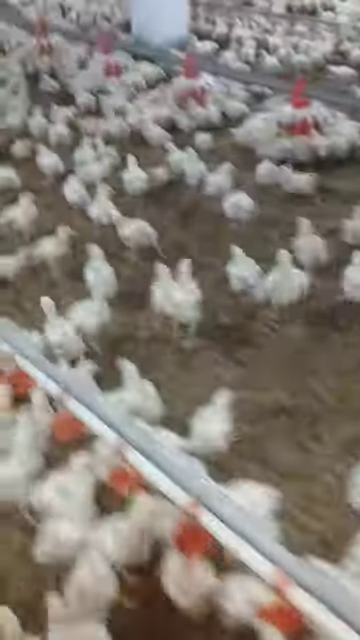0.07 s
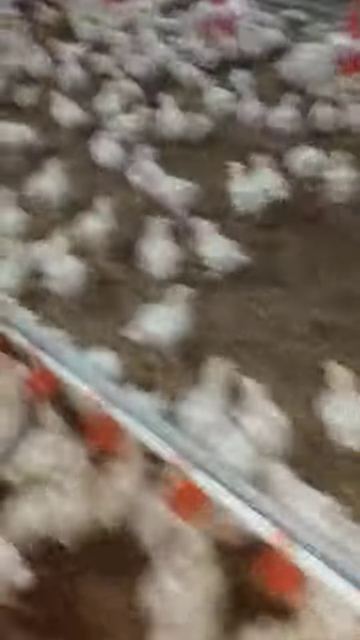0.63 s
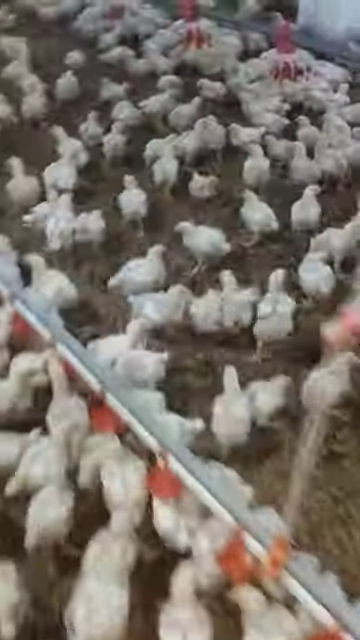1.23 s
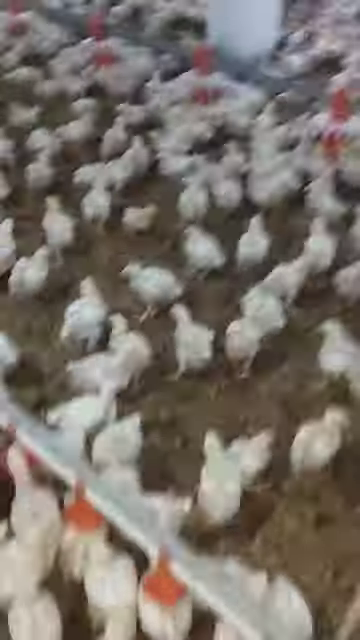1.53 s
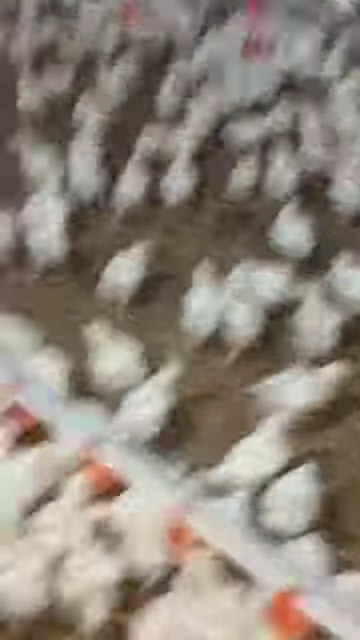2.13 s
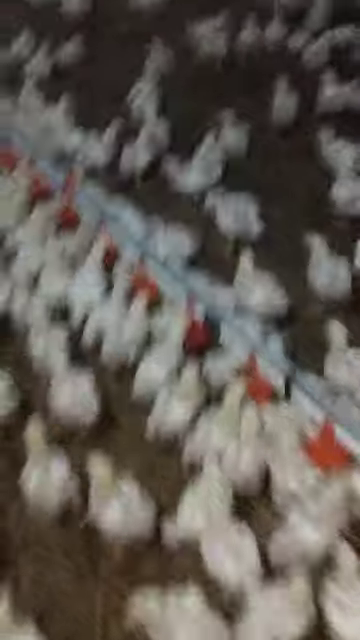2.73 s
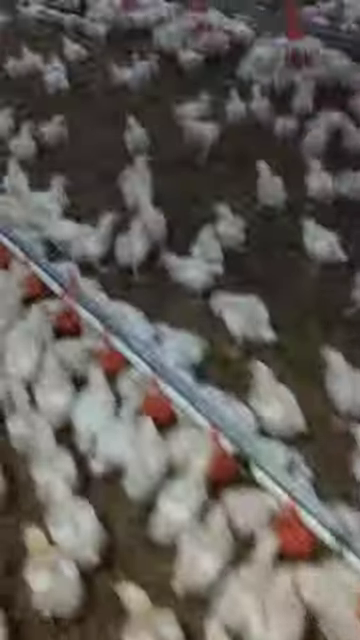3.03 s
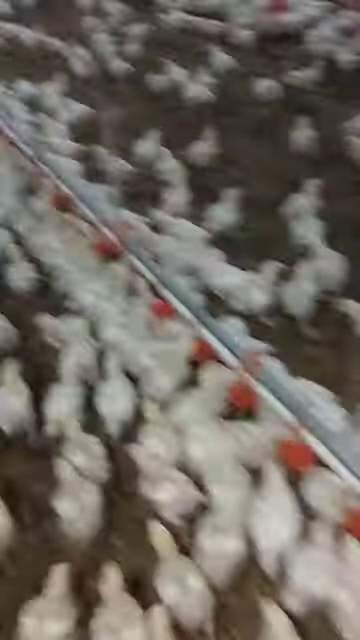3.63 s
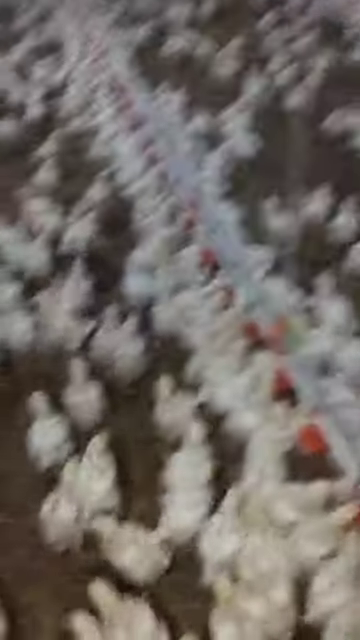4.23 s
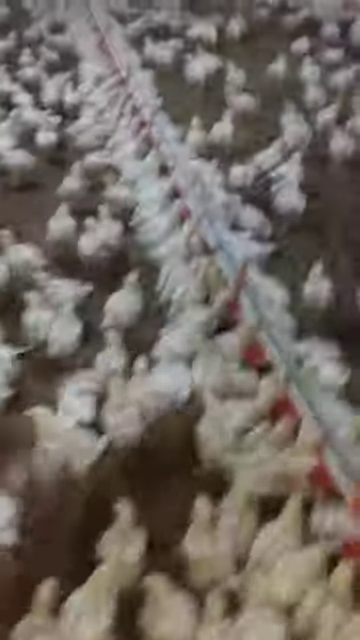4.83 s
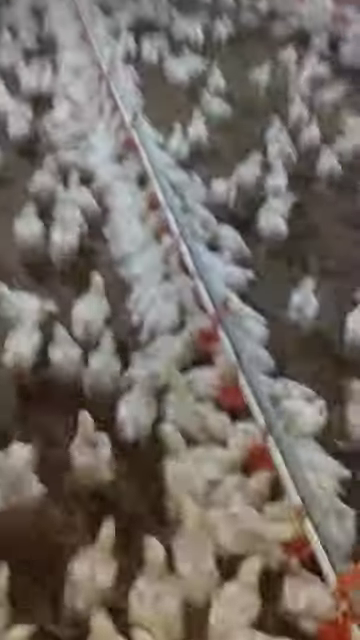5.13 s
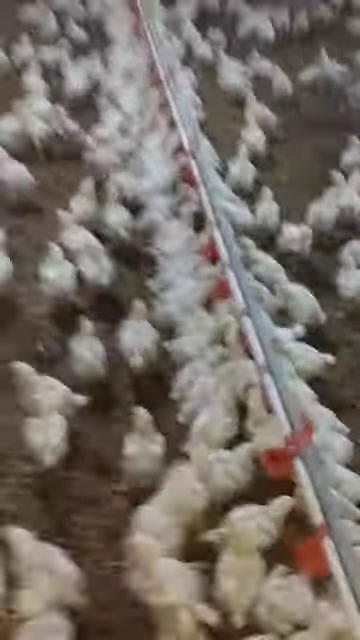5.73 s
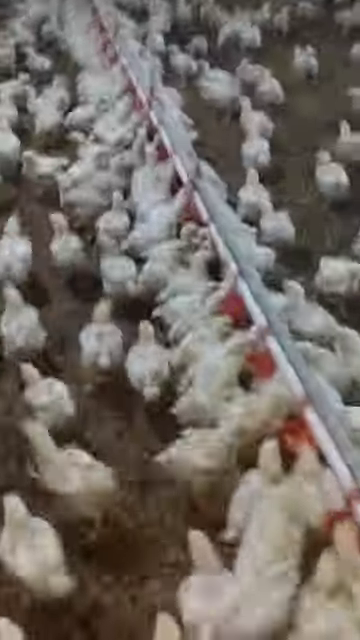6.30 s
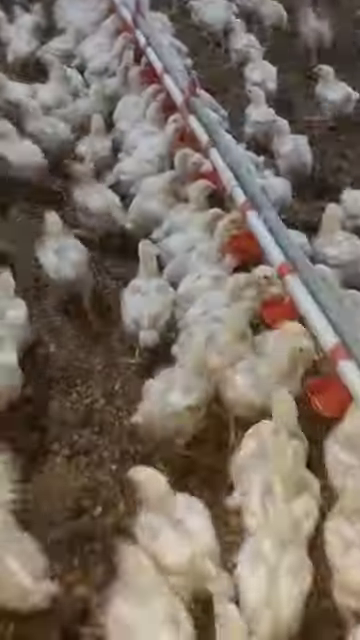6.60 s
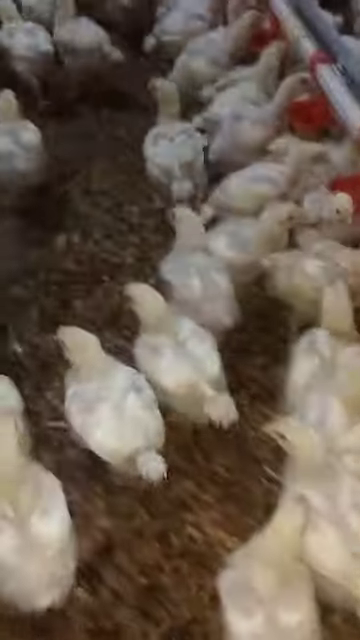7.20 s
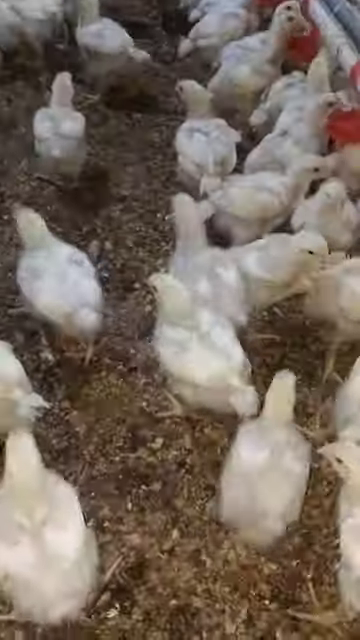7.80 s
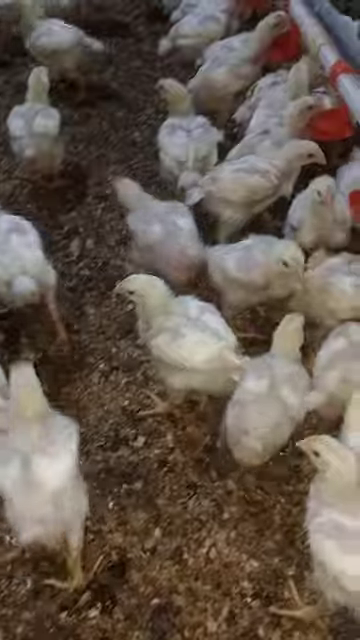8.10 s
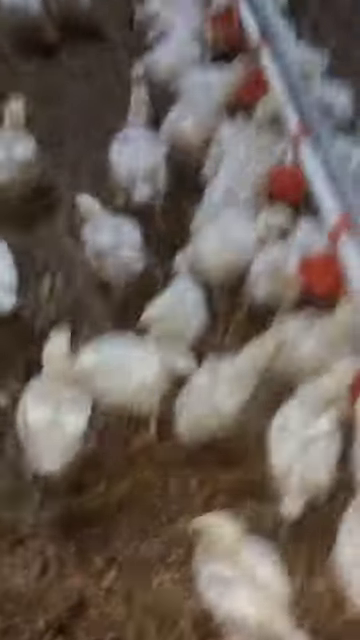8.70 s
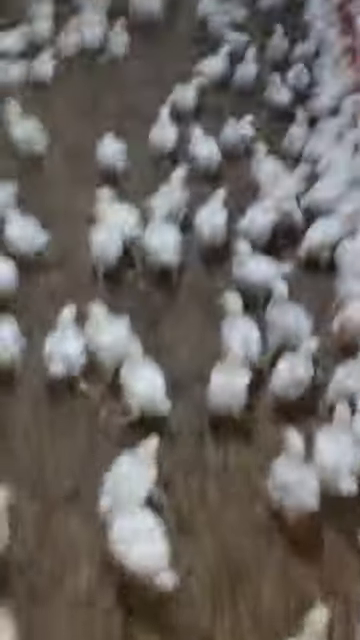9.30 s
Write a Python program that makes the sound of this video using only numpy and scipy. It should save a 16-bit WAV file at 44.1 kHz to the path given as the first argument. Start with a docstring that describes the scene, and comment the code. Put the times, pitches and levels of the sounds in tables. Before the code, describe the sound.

Inside a poultry shed, a dense, slightly echoing chorus of young chickens chirps over the pulsing hum and airy rumble of fans. The hand-held microphone is partly covered at first and opens up with a short bump. Close high trills and squeaks stand out around the middle, then separate falling peeps as the flock eases a little. Light pecks and litter rustle are scattered through, and the chorus swells again near the end.

```python
"""Hundreds of young chickens peep down a long poultry shed, their far voices merged into a band of chatter.
Under them two ventilation fans beat against each other, with a rumble and a rush of air.
Close to the hand-held microphone, birds whistle, trill and squeak, scratch and peck in the litter.
The hand half covers the microphone port at first; the treble opens as it comes free with a bump."""
import sys
import numpy as np
from scipy import signal
from scipy.fft import rfft, irfft, next_fast_len
from scipy.io import wavfile

SR = 44100
rng = np.random.default_rng(int(sys.argv[2]) if len(sys.argv) > 2 else 0)


def waveform_to_disk(signal):
    """Save audio, clipped to [-1, 1], as 16-bit WAV at the path in sys.argv[1]."""
    frames = np.transpose(np.atleast_2d(signal))
    scaled = np.clip(frames, -1, 1) * 32767
    samples = np.round(scaled).astype(np.int16)
    wavfile.write(sys.argv[1], SR, samples)


N = 421155
TIME = np.arange(N) / SR


def from_db(db):
    """Decibels to gain."""
    return 10 ** (np.asarray(db) / 20)


def unit_rms(x):
    """Scale to rms 1."""
    return x / np.sqrt(np.mean(x ** 2) + 1e-20)


def gains_in_time(rows):
    """One gain curve for each dB column that follows the time column."""
    seconds, *columns = np.transpose(rows)
    return [from_db(np.interp(TIME, seconds, db)) for db in columns]


def gain_at(spectrum, hz):
    """Read a spectrum's gain on a log-frequency axis."""
    points, db = np.transpose(spectrum)
    return from_db(np.interp(np.log(hz + 1e-9), np.log(points), db))


def noise(spectrum):
    """Coloured noise, rms 1."""
    size = next_fast_len(N)
    colour = gain_at(spectrum, np.fft.rfftfreq(size, 1 / SR))
    return unit_rms(irfft(rfft(rng.standard_normal(size)) * colour, size)[:N])


def drift(rate_hz, size=N):
    """A random wander, spread about 1."""
    steps = TIME[:size] * rate_hz + rng.random()
    knots = rng.standard_normal(int(steps[-1]) + 2)
    return np.sqrt(3 / 2) * np.interp(steps, np.arange(len(knots)), knots)


def split(x, hz, order=4):
    """The parts below and above a frequency."""
    low = signal.sosfiltfilt(signal.butter(order, hz, fs=SR, output="sos"), x)
    return low, x - low


def add(out, start_s, sound):
    """Mix a sound in at a time, trimmed to the scene."""
    i = int(start_s * SR)
    first, last = max(i, 0), min(i + len(sound), N)
    if last > first:
        out[first:last] += sound[first - i:last - i]


def shed(x, wet_db, t60_s=1):
    """The direct sound reaches the microphone, then the shed's tail, dulled by litter and feathers."""
    t = TIME[:SR]
    dull, _ = split(rng.standard_normal(SR), 7600, order=1)
    tail = dull * from_db(-60 * t / t60_s) * (t > .006)
    return x + from_db(wet_db) * signal.fftconvolve(x, tail / np.linalg.norm(tail))[:N]


TRILL_RATE_HZ = 40.96


def syrinx(length_s, start_hz, middle_hz, end_hz, depth_hz, rate_hz):
    """Pitch and loudness of one peep: an arc through three pitches, with a quick start."""
    t = TIME[:max(int(length_s * SR), 64)]
    u = t / t[-1]
    pitch = start_hz + (end_hz - start_hz) * u + (2 * middle_hz - start_hz - end_hz) * 2 * u * (1 - u)
    if depth_hz:
        # a trill is a chain of uneven arches with sharp dips between them
        arches = np.abs(np.cos(np.pi * rate_hz * t + 0.305 * drift(44.96, len(t))))
        pitch = pitch + 2 * depth_hz * (arches - 2 / np.pi)
    swell = np.sqrt(np.abs(np.sin(np.pi * u ** 1.15)))
    return pitch, swell


# Colour of the overtones as heard through the microphone, with its peak near 15 kHz.
# Each row: frequency in Hz, gain in dB.
OVERTONES_AT_MIC = [(3000, -3), (7200, -3), (10000, -14), (14500, 4), (17000, 2.5)]


def whistle(pitch, overtones_db, rough):
    """A soft peep has little above its octave; a high or strained voice is bright, a rough one rasps."""
    size = len(pitch)
    jitter = 0.01 * drift(130, size) + (0.0045 + 0.016 * rough) * drift(1100, size)
    phase = 2 * np.pi * np.cumsum(pitch * (1 + jitter)) / SR
    strain = np.clip(rough + max(pitch.mean() - 2700, 0) / 700, 0, 1)
    step_db = -10 + 6 * strain
    overtones = np.zeros(size)
    for k in range(2, 6):
        level = from_db(step_db * (k - 1) + 2.9 * drift(90, size))
        overtones += gain_at(OVERTONES_AT_MIC, k * pitch) * level * np.sin(k * phase)
    flutter = from_db((2.22 + 1.1 * rough) * drift(180, size))
    rasp = 1 + 0.17 * rough * drift(1500, size)
    return flutter * rasp * (np.sin(phase) + from_db(overtones_db) * overtones)


# Strength of a voice from across the shed. Each row: pitch in Hz, gain in dB.
VOICE_STRENGTH = [(710, -52), (1200, 5.5), (1330, -10), (1710, -1), (2090, 2), (2480, 2), (2840, -4),
                  (4000, -29), (5200, -68), (8800, -120)]


def crowd(count, spread_db, fall, overtones_db=None):
    """Random falling peeps, one in three trilled; pure tones unless near enough for overtones to carry."""
    out = np.zeros(N)
    for when, size, height, slope, arch, trill, rate, distance in rng.random((count, 8)):
        hz = 1400 + 2200 * height
        middle_hz = hz * (1 + 0.0815 * (arch - .3))
        drop = fall * (slope + 0.086)
        trilled = trill < 1 / 3
        pitch, swell = syrinx(.018 + .065 * size ** 2, hz * (1 + drop / 2), middle_hz, hz * (1 - drop / 2),
                              depth_hz=180 * trilled, rate_hz=TRILL_RATE_HZ * (.5 + rate))
        if overtones_db is None:
            tone = np.sin(2 * np.pi * np.cumsum(pitch) / SR)
        else:
            tone = whistle(pitch, overtones_db, rough=trilled / 2)
        level = from_db(spread_db * distance) * gain_at(VOICE_STRENGTH, pitch)
        add(out, when * (N / SR + .05) - .05, level * swell * tone)
    return unit_rms(out)


# The chorus swells as the microphone moves over the flock.
# Each row: time in seconds, relative levels in dB of the peeps above 2 kHz and of the chirps below.
CHORUS_LEVELS = [(0, -25.5, -33.5), (0.6, -31, -35.5), (1, -33, -40.5), (1.3, -29.5, -35), (1.8, -31, -37),
                 (2.45, -28, -35), (2.7, -24, -36), (3.0, -22.5, -31.5), (3.4, -25.5, -33),
                 (4.3, -29, -33.5), (5.0, -30, -31), (5.6, -30.0, -37.5), (6.0, -29, -36),
                 (6.75, -29, -39.5), (7.05, -33, -40.5), (8.6, -32, -41.5), (9.1, -28.5, -28.5),
                 (9.55, -29.5, -36.5)]


def flock():
    """Far groups blur in echo, each by its own paths; the middle distance keeps its separate peeps."""
    far = sum(shed(crowd(count=1000, spread_db=-5.5, fall=0.2947), wet_db=-1) for _ in range(3))
    middle = shed(crowd(count=850, spread_db=3.5, fall=0.35, overtones_db=-17), wet_db=-9)
    chirps, peeps = split(unit_rms(far) + unit_rms(middle), 2036)
    peep_gain, chirp_gain = gains_in_time(CHORUS_LEVELS)
    return from_db(0.46) * peep_gain * unit_rms(peeps) + from_db(0.1) * chirp_gain * unit_rms(chirps)


# Fan hum, louder and softer from place to place. Each row: time in seconds, relative level in dB.
HUM_LEVELS = [(0, -49), (.8, -38.5), (1.6, -40), (3, -31.5), (4.6, -36.5), (5.15, -33), (6.3, -42),
              (6.8, -33), (7.35, -40), (8, -35), (8.6, -41), (9.5, -37)]
# Blade tone and sidebands of the first fan. Each row: multiple of the shaft rate, relative level in dB.
FAN_PARTIALS = [(3, -9.5), (4, 0), (5, -12), (6, -12.5), (7, -9.5), (8, -17), (9, -15)]
BLADES, BLADE_TONES_HZ, FANS_IN_STEP_S = 4, (113.97, 119.35), 2.97


def fans():
    """Two four-bladed fans at nearly the same speed throb over the hum of a motor."""
    level, = gains_in_time(HUM_LEVELS)
    first_phase, second_phase = (2 * np.pi * hz * (TIME - FANS_IN_STEP_S) for hz in BLADE_TONES_HZ)
    first_fan = np.zeros(N)
    for k, db in FAN_PARTIALS:
        strength = from_db(db + 1.5 * drift(3))
        sideband_wander = (k != BLADES) * .6 * drift(2)
        first_fan += strength * np.cos(k / BLADES * first_phase + sideband_wander)
    second_fan = from_db(2) * np.cos(second_phase) + from_db(-17.5) * np.cos(2 * second_phase)
    motor = from_db(-42.5 + 2 * drift(2)) * np.sin(2 * np.pi * 100.6 * TIME)
    return np.sqrt(2) * level * (first_fan + second_fan) + motor


# Ventilation at the microphone. Each row: time in seconds, relative levels in dB of rumble and of rush.
AIR_LEVELS = [(0.0, -31, -39), (1.86, -36, -40), (2.58, -31.5, -37.5), (4.36, -33, -38), (6.97, -37, -45),
              (9.36, -32, -41.5), (9.55, -30.5, -41)]
# Colours of the rumble and of the rush. Each row: frequency in Hz, gain in dB.
RUMBLE_COLOUR = [(25, -39), (45, -34), (65, -19.5), (85, -3), (115, 6.5), (160, -2.5), (200, 0.5),
                 (255, -5.5), (300, -11), (400, -21), (900, -59)]
RUSH_COLOUR = [(150, -40.5), (330, 3), (600, 0.5), (1000, 0.5), (1400, -4), (2500, -8.5), (4000, -22),
               (9000, -50)]


def air():
    """The ventilation rumbles and rushes through the shed."""
    rumble_gain, rush_gain = gains_in_time(AIR_LEVELS)
    return from_db(3) * (rumble_gain * noise(RUMBLE_COLOUR) + rush_gain * noise(RUSH_COLOUR))


# Litter rustle and microphone hiss together. Each row: time in seconds, relative level in dB.
HISS_LEVELS = [(3.2, -43), (4.49, -44), (6.81, -48), (6.95, -50.5), (8.59, -50), (8.73, -46), (9.02, -43),
               (9.55, -47.5)]
# Their colour, with the port's peak near 15 kHz. Each row: frequency in Hz, gain in dB.
HISS_COLOUR = [(2300, -28.5), (3900, -2), (4500, 1), (5500, 2.5), (6400, 0), (7400, -0.5), (8500, -6.5),
               (10000, -10.5), (12500, -7.5), (14800, 0), (15800, 0.5)]


def rustle_and_hiss():
    """A fine, flickering treble hiss, part feet and feathers in the litter, part microphone."""
    level, = gains_in_time(HISS_LEVELS)
    return level * noise(HISS_COLOUR) * from_db(-1 + 1.53 * drift(200))


def near_call(length_s, hz, db, overtones_db, fall, arch=0, depth_hz=0):
    """One close call slides down and arches by shares of its pitch; a deeper trill is rougher."""
    start_hz, end_hz = hz * (1 + fall / 2 - arch), hz * (1 - fall / 2 - arch)
    pitch, swell = syrinx(length_s, start_hz, hz, end_hz, depth_hz, TRILL_RATE_HZ)
    rough = 0.68 * min(depth_hz / 220, 1)
    return from_db(db + 1.5) * swell * whistle(pitch, overtones_db, rough)


# Falling peeps close to the microphone. Each row: start in seconds, length in seconds,
# mid-call pitch in Hz, relative level in dB, overtone gain in dB.
NEAR_PEEPS = [(0.108, .014, 2068, -13, -12), (0.504, .04, 1790, -25, -18), (1.958, 0.095, 1700, -38, -21),
              (2.142, 0.031, 2000, -18.5, -17), (2.715, 0.045, 1760, -22, -17),
              (2.947, 0.054, 2280, -25.5, -7), (3.095, 0.028, 1680, -24.5, -25),
              (3.132, 0.028, 1470, -28, -14), (3.439, 0.028, 1450, -25, -14), (3.493, 0.03, 2160, -18, -28),
              (3.846, 0.028, 1450, -29.5, -22), (4.394, 0.04, 1630, -32, -20),
              (5.593, .043, 2200, -24, -26), (5.735, 0.018, 2140, -21, -25),
              (6.88, 0.039, 2370, -23.5, -16), (7.095, 0.083, 2620, -31, -20), (7.25, 0.08, 2760, -26, -17),
              (7.317, .055, 2540, -31, -11), (7.48, 0.059, 2600, -24.5, -15), (7.688, .035, 2380, -36, -6),
              (7.522, 0.0293, 2180, -28, -2), (7.561, 0.059, 2540, -33, -10),
              (7.736, 0.023, 2420, -29, -3.5), (7.955, 0.044, 2290, -23.5, -21),
              (8.089, 0.045, 2700, -31, -12), (8.241, 0.064, 2290, -25.5, -9.5),
              (8.485, .045, 2540, -36, -14), (8.516, 0.032, 2150, -30, -4),
              (8.714, 0.051, 2130, -25.5, -12)]
# Close trills. Each row: start in seconds, length in seconds, mid-call pitch in Hz,
# trill depth in Hz, relative level in dB, overtone gain in dB.
NEAR_TRILLS = [(0.122, .026, 2154, 150, -14, -13.5), (0.15, 0.025, 1957, 145, -22, -20),
               (0.248, 0.069, 1950, 77, -21.5, -30), (0.772, 0.14, 2860, 20, -35, -14),
               (1.226, 0.15, 3110, 110, -37, -5), (2.068, .08, 2990, 116, -30, -19),
               (2.19, 0.058, 1930, 130, -24, -11), (2.573, 0.15, 2660, 190, -23.5, -11),
               (2.893, 0.08, 2410, 250, -21, -13.5), (4.038, 0.068, 1920, 110, -23, -16),
               (4.278, 0.18, 2830, 110, -32.5, 0), (4.798, 0.073, 3080, 60, -31, -12),
               (5.15, 0.12, 3056, 220, -24, -12.5), (5.212, 0.099, 3240, 190, -21.5, -14),
               (5.282, 0.071, 3080, 165, -24.5, -8), (5.447, .06, 3060, 214, -24, -11),
               (5.923, 0.053, 2414, 200, -22.5, -14), (5.994, .05, 2300, 150, -23.5, -16),
               (5.998, 0.028, 3480, 220, -31.5, -14), (6.147, 0.065, 3370, 160, -39, -14),
               (6.412, 0.0456, 1604, 180, -24.5, -13), (6.625, 0.04, 2860, 305, -19, -19.5),
               (8.894, 0.15, 3090, 170, -33, -10.5), (9.037, 0.0359, 2800, 230, -28.5, -7),
               (9.077, 0.034, 2350, 190, -30, -4)]
# A higher trill holds its pitch better. Each row: pitch in Hz, share of it lost over the call.
FALL_BY_PITCH = [(2400, 0.1616), (3000, 0.018)]
# Strained squeaks, high and arched. Each row reads as for the peeps.
NEAR_SQUEAKS = [(3.315, 0.022, 3640, -39, 1), (3.42, 0.031, 3700, -43, 9), (5.14, 0.037, 3970, -38, -7),
                (5.504, 0.052, 3530, -29.5, -5), (5.55, 0.032, 3600, -38, 7.5),
                (5.577, 0.03, 3600, -39, 4.5), (5.8, 0.025, 3460, -37, -3)]


def near_birds(stray_count=70):
    """The closest birds peep, trill and squeak. Floor and feed line echo each call."""
    # softer peeps at random times and pitches
    strays = [(when * N / SR, 0.0259 + 0.045 * size, 1610 + 1245 * height, -43 - 0.5 * distance, -1)
              for when, size, height, distance in rng.random((stray_count, 4))]
    calls = [(start, near_call(*peep, fall=0.225, arch=0.022)) for start, *peep in NEAR_PEEPS + strays]
    for start, length_s, hz, depth_hz, db, overtones_db in NEAR_TRILLS:
        fall = np.interp(hz, *np.transpose(FALL_BY_PITCH))
        calls.append((start, near_call(length_s, hz, db, overtones_db, fall, depth_hz=depth_hz)))
    calls += [(start, near_call(*squeak, fall=0.041, arch=0.077)) for start, *squeak in NEAR_SQUEAKS]
    out = np.zeros(N)
    for start, call in calls:
        add(out, start, call)
        for echo_s in rng.uniform(0.0028, 0.02, 2):
            add(out, start + echo_s, from_db(-13) * call)
    return out


# The loudest pecks nearby. Each row: start in seconds, relative level in dB.
LOUD_PECKS = [(1.32, -25), (1.445, -27), (1.775, -27), (2.832, -26), (2.838, -30), (3.69, -25),
              (4.5744, -27), (5.745, -25.5), (7.182, -32), (7.9174, -32), (8.3153, -28), (8.556, -28.5),
              (8.6248, -24), (8.73, -30), (9.0734, -27)]
# Colour of a beak's tick at the microphone. Each row: frequency in Hz, gain in dB.
TICK_COLOUR = [(400, -21.5), (1500, 3), (5000, 1.5), (7300, 6), (10500, -8.5), (15000, 8), (17000, -16)]


def pecking(faint_count=60, decay_s=0.0029):
    """Beaks strike the litter in sharp ticks, with fainter ones scattered at random."""
    faint = [(when * N / SR, -41 + 12 * size ** 2) for when, size in rng.random((faint_count, 2))]
    envelope = np.zeros(N)
    for start, db in LOUD_PECKS + faint:
        add(envelope, start, from_db(db - 5.5) * np.exp(-TIME[:2000] / decay_s))
    return envelope * noise(TICK_COLOUR)


# Knocks on the microphone itself. Each row: start in seconds, pitch in Hz, length in seconds, level in dB.
CASING_BUMPS = [(2.822, 186, 0.02, -10), (2.836, 623, 0.01, -21.5), (3.094, 453, 0.0039, -14.5),
                (5.739, 393, 0.014, -25)]


def hand_bumps():
    """The hand bumps the casing: a few dull cycles each time."""
    out = np.zeros(N)
    for start, hz, length_s, db in CASING_BUMPS:
        t = TIME[:int(length_s * SR)]
        add(out, start, from_db(db) * np.hanning(len(t)) * np.sin(2 * np.pi * hz * t))
    return out


# The grip shifts and uncovers the microphone port in steps.
# Each row: start in seconds, gains in dB at 3.9-7 kHz, at 7-11 kHz and above 11 kHz.
PORT_GRIPS = [(0, -9.5, -10.5, -19), (.5, -14.5, -16, -20), (2.12, -11, -12, -21), (2.56, 1.5, -1.5, -7),
              (3.08, -0.5, 5, -2), (4.2, -1, 4, 1.5)]


def covered_port(x, slide_s=0.045):
    """The hand over the port shades three treble bands; each grip holds until it slides to the next."""
    rows = [PORT_GRIPS[0]]
    for (_, *before), (start, *after) in zip(PORT_GRIPS, PORT_GRIPS[1:]):
        rows += [(start, *before), (start + slide_s, *after)]
    treble_gain, upper_gain, top_gain = gains_in_time(rows)
    body, rest = split(x, 3900)
    treble, rest = split(rest, 7000)
    upper, top = split(rest, 11000)
    return body + treble_gain * treble + upper_gain * upper + top_gain * top


def scene():
    """The shed from among the birds, in one channel."""
    birds = flock() + shed(near_birds(), wet_db=-17.5)
    return (birds + fans() + air() + rustle_and_hiss() + pecking() + hand_bumps())[None]


def record(dry, notch_hz=7920, cutoff_hz=15750):
    """The hand-held microphone: a shaded port, a narrow dip in the treble, and the very top cut off."""
    shaded = covered_port(dry)
    notched = signal.lfilter(*signal.iirnotch(notch_hz, Q=63, fs=SR), shaded)
    return signal.sosfilt(signal.ellip(10, .2, 80, cutoff_hz, fs=SR, output="sos"), notched)


dry = scene()
out = record(dry)
waveform_to_disk(out)
```